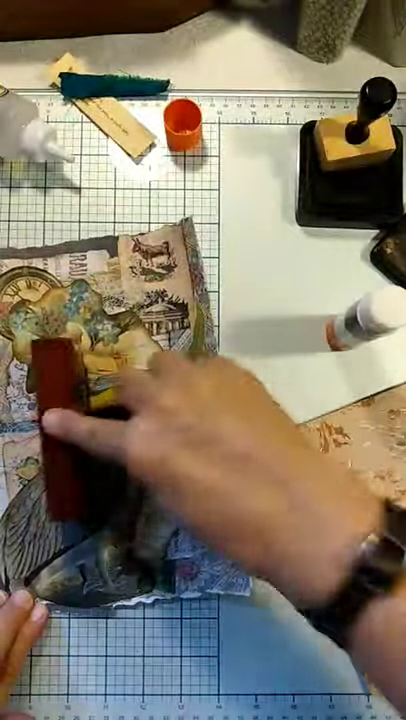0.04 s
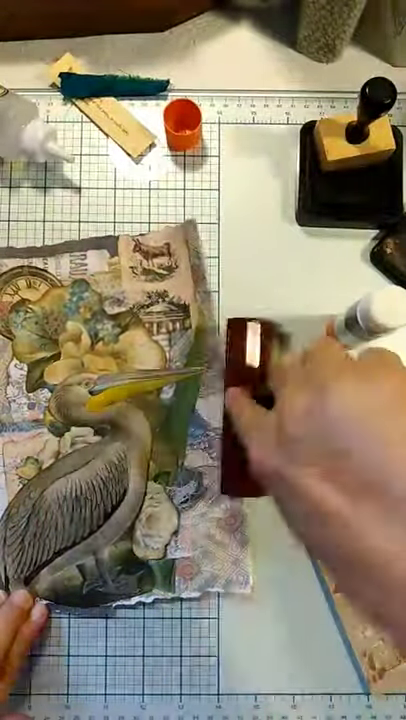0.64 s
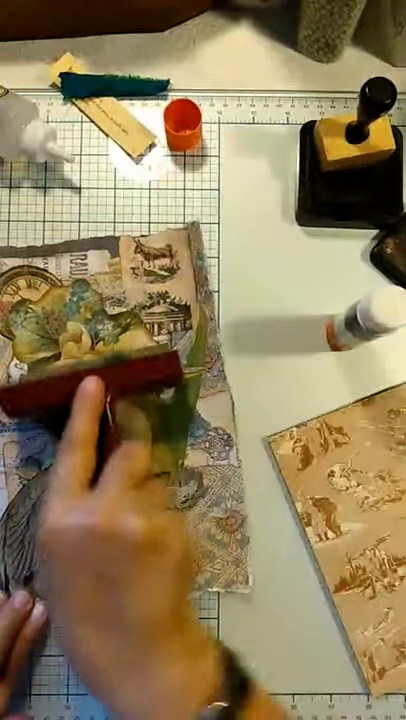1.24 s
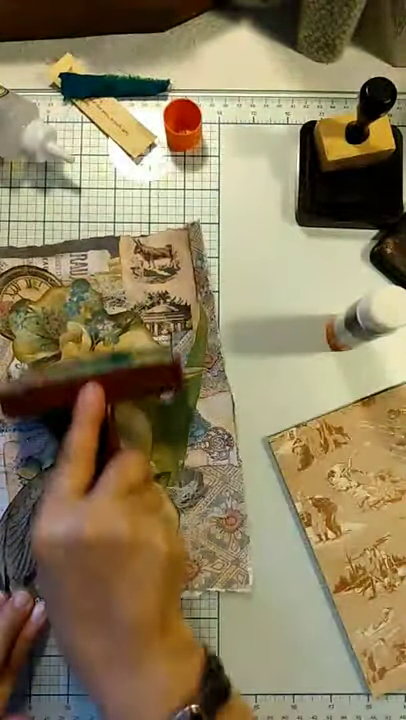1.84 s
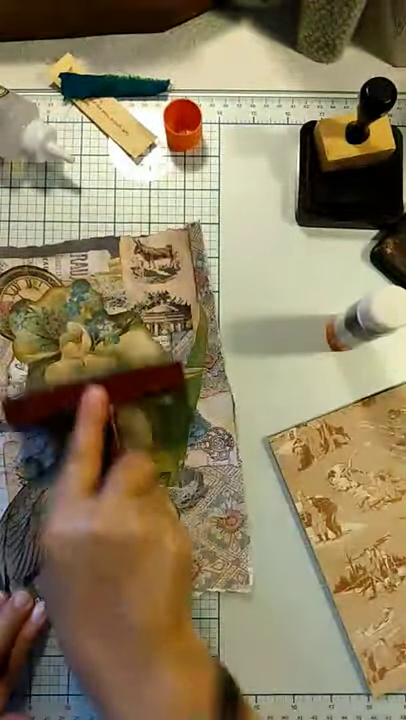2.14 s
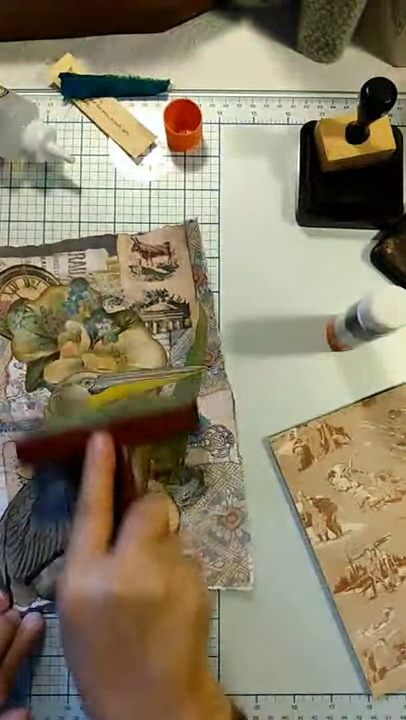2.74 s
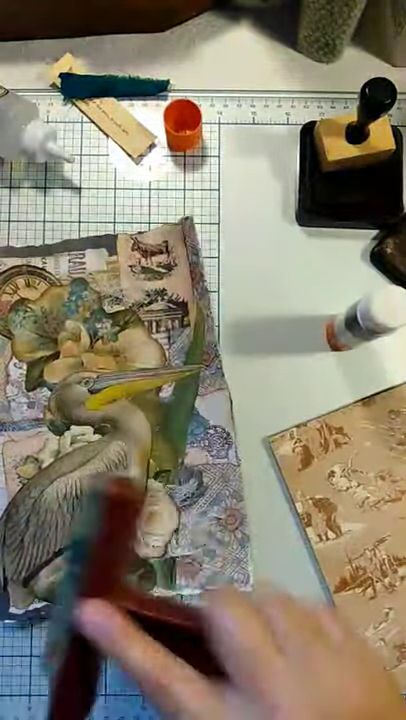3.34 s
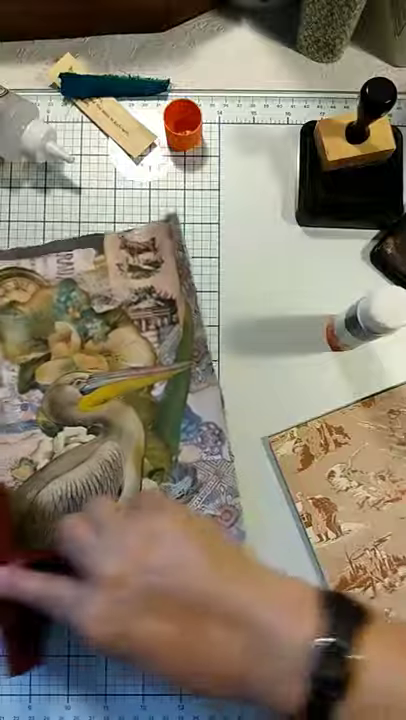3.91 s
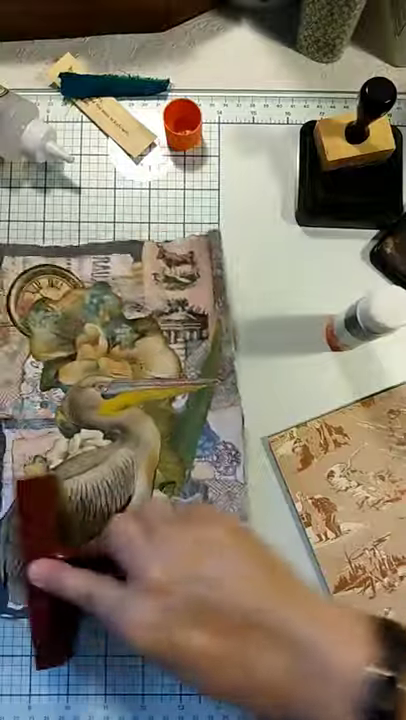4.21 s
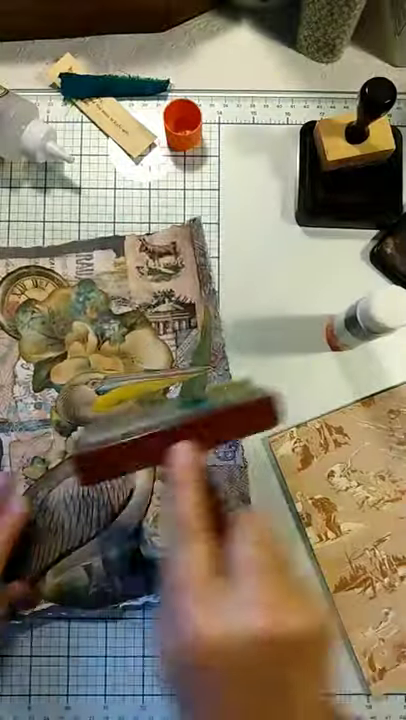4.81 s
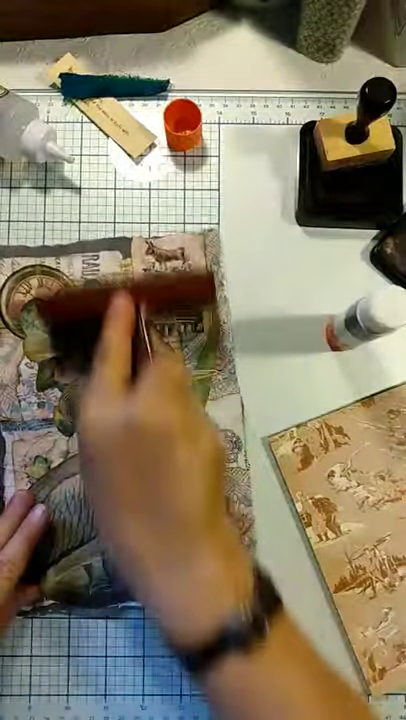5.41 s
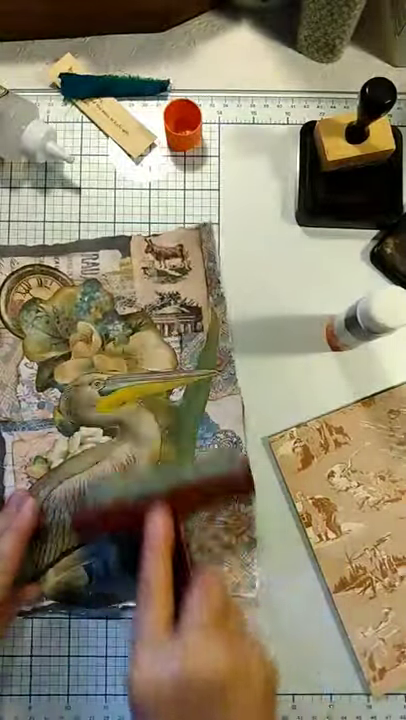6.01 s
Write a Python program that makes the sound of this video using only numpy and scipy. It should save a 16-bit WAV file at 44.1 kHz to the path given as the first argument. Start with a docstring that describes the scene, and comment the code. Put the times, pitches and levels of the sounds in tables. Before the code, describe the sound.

A rubber hand roller is pushed back and forth over glued paper on a craft table. Each stroke gives a fine, sticky crackle with small dry snaps, while the loose roller clicks in its metal frame and the axle chirps faintly. The tool thumps on the table midway, then clacks hard several times before more rolling with a low rumble. The microphone is close, in a small quiet room.

```python
"""Rubber brayer on a paper collage

A brayer rolls over glued paper on a craft table, close to a phone in a small room. Its tacky rubber
peels off the paper in a fine crackle, and the loose roller chirps and knocks in its frame. It lands
on the table with a thump, and the frame clacks hard when the tool is turned over and set down."""
import sys
import numpy as np
from scipy import signal
from scipy.fft import rfft, irfft
from scipy.io import wavfile

SR = 44100
rng = np.random.default_rng(int(sys.argv[2]) if len(sys.argv) > 2 else 0)


def master(y):
    """Save y as 16-bit WAV."""
    cut = np.clip(np.atleast_2d(y).T, -1, 1)
    pcm = np.round(cut * 32767)  # scale
    wavfile.write(sys.argv[1], SR, pcm.astype(np.int16))


N = 267000
T = np.arange(N) / SR

# Levels in the event tables are relative: each source adds its own gain. Pan is left minus right.
# Pushes and pulls. Each row: time of peak speed, rise and fall in seconds, then crackle level,
# rubbing level, rumble level and pan in dB.
ROLLER_STROKES = [(0.018, 0.085, 0.053, -54, -90, -82, -2), (0.112, 0.054, .065, -48.5, -76, -78, -2),
                  (0.295, 0.1, 0.089, -49, -67.5, -78, -1.5), (0.39, 0.087, 0.19, -62.5, -84.5, -81, 0),
                  (0.74, 0.21, 0.1, -61.5, -95, -86.5, 0), (1.72, 0.31, 0.34, -65.5, -85.5, -90, -0.5),
                  (2.02, 0.35, 0.5, -66, -92, -87, 3), (2.305, 0.11, 0.098, -51.5, -75.5, -80, 1),
                  (2.833, 0.054, 0.034, -51, -85, -70, 3.5), (2.929, 0.11, 0.056, -52, -84, -77, 6),
                  (2.978, .025, 0.095, -37, -73, -71.5, 5.5), (3.081, 0.077, 0.15, -48.5, -75.5, -85, 0.5),
                  (3.827, 0.065, 0.19, -48.5, -63.5, -76, 0), (4.08, 0.093, 0.1, -63, -78, -84.5, -3),
                  (4.2, 0.091, 0.074, -63.5, -88, -90, -3), (4.345, 0.11, 0.042, -56.5, -83, -84.5, -4),
                  (4.41, 0.042, 0.13, -47, -80.5, -81, -2.5), (4.56, 0.053, .04, -52.5, -73, -82.5, -5),
                  (5.42, 0.14, 0.26, -53.5, -76.5, -58.5, -3), (5.78, 0.033, 0.18, -50.5, -94, -66.5, -1.5),
                  (5.915, 0.058, 0.094, -54.5, -70, -73, 2), (5.995, 0.094, 0.086, -44.5, -69, -71, 3.5)]
# The roller hits its frame. Each row: time in seconds, ring level in dB, main frame resonance in Hz,
# tick level in dB, handle level in dB.
ROLLER_KNOCKS = [(0.7567, -40.5, 3120, -46, -71), (0.9825, -25.5, 3114, -36.5, -55),
                 (1.026, -26.5, 3310, -33, -51), (1.3447, -44, 3150, -54, -59),
                 (1.355, -34, 3170, -41.5, -44.5), (2.3067, -28, 3115, -42, -49),
                 (2.3831, -25.5, 3170, -32.5, -48), (2.5103, -26, 3060, -34, -52.5),
                 (2.7375, -20, 3220, -26.5, -36.5), (3.239, -46, 3280, -49, -67),
                 (3.3859, -44, 2950, -58, -64.5), (3.4485, -30, 3420, -44.5, -61.5),
                 (3.7024, -25, 3090, -26, -40), (3.933, -59.5, 2880, -53, -71.5),
                 (4.5802, -31, 3105, -40.5, -52.5), (4.7108, -45.5, 2850, -58, -77),
                 (4.794, -19.5, 3130, -32, -39), (4.8415, -43, 2900, -66, -58)]
# The frame hits the table. Each row: time in seconds, body and treble levels in dB, decay in seconds.
FRAME_CLACKS = [(4.8834, -25.5, -17.5, 0.0073), (4.914, -22.5, -59, 0.015), (5.0035, -24.5, -22, 0.0071),
                (5.151, -37.5, -47, 0.0061), (5.1875, -27, -26.5, 0.0017)]
# The largest sticky spots let go. Each row: time in seconds, then crackle level, pop level, pan in dB.
LARGE_SNAPS = [(0.0722, -38, -85, -8), (0.0874, -30, -87, -1), (0.1078, -34, -82, -12),
               (0.1401, -37.5, -88, -3), (0.382, -43, -90, 4), (0.463, -44, -74, 1),
               (0.597, -45, -58.5, -0.5), (1.3196, -44, -51.5, 0), (1.5891, -44, -78.5, 12),
               (1.6504, -39, -90, -2), (1.718, -30, -44.5, -5), (1.8262, -32.5, -64, 6.5),
               (1.916, -34.5, -96.5, -5.5), (1.9615, -38, -49, -6), (1.9794, -33, -48, -5.5),
               (2.0901, -39, -68, 0), (2.1227, -36.5, -72, -3.5), (2.1581, -31.5, -44, -2.5),
               (2.2034, -32.5, -50.5, -5), (2.5731, -39, -74.5, -10.5), (2.6584, -32.5, -41.5, -9),
               (2.973, -18.5, -48, 4.5), (3.022, -33, -49.5, -0.5), (3.3405, -41, -87, 0),
               (3.8216, -28, -57, -10), (4.4006, -33.5, -74, 0), (5.6147, -36, -79, -0.5),
               (5.756, -33.5, -75, -11), (5.7706, -27, -71, 12.5)]
# The table takes the load. Each row: time in seconds, boom and board levels in dB, boom decay in seconds.
TABLE_THUMPS = [(0.8, -76.5, -70, 0.016), (1.904, -85, -70.5, 0.007), (2.744, -37, -38.5, 0.044),
                (3.714, -46.5, -40, 0.023), (5.287, -54, -75, 0.021), (5.363, -42.5, -103, 0.012),
                (5.389, -40, -87, 0.0056), (5.465, -45.5, -78, 0.015)]
# Chirps of the dry axle. Each row: start in seconds, level in dB.
AXLE_CHIRPS = [(0.956, -42), (1.727, -39), (1.8455, -39), (1.979, -38), (2.038, -39), (2.09, -39.5),
               (2.195, -38.5), (2.3247, -26), (3.412, -50), (3.6665, -43), (4.7867, -25.5), (5.338, -44)]

# Modes of the frame and hollow handle. Each row: ratio to the main mode, bandwidth in Hz, gain in dB.
FRAME_MODES = [(0.719, 200, -10), (0.829, 221, -9.5), (.93, 170, 1), (1, 160, 2), (1.24, 263, -2.5),
               (1.599, 396, -22.5)]
HANDLE_MODES = [(.68, 89.3, -3), (1, 100, -2), (1.381, 130, -2.5), (1.9, 120, -2)]
# Modes of the rubbed frame and table top. Each row: frequency and filter bandwidth in Hz, gain in dB.
RUBBED_MODES = [(1072, 86, -17.5), (2520, 90, -13), (3142, 110, 2.5), (3617, 87, -12), (4310, 150, -7.5)]
TABLE_MODES = [(116.9, 5.9, 4), (172.6, 7.2, -5), (402, 8.4, -7.5)]
# Long ring of the metal. Each row: frequency in Hz, relative level in dB, 60 dB decay time in seconds.
METAL_PARTIALS = [(1160, -6, 0.33), (1540, -16.5, .35), (1720, -9, .45), (2200, -13.5, 0.3),
                  (2880, -6, 0.36), (2918, -9.5, 0.41), (3250, 12, 0.2), (3210, 5.5, 0.26)]
# Mains hum. Each row: frequency in Hz, level in dB.
HUM_PARTIALS = [(60, -89), (120, -82.5), (181, -84.5), (241, -91.5)]

# Spectra of the noisy sounds. Each row: frequency in Hz, relative spectral density in dB.
AIR_SPECTRUM = [(25, -19.5), (55, -5.5), (100, -9), (190, -9.5), (290, -11.5), (420, -9), (750, -17.5),
                (1400, -18.5), (3000, -23), (6000, -29), (10000, -22), (16000, -42.5)]
BOOM_SPECTRUM = [(35, -25.5), (55, -2), (85, 4.5), (120, 3.5), (190, -4.5), (300, -28.5), (700, -58)]
BOARD_SPECTRUM = [(130, -10), (210, -2), (290, -7), (400, -3.5), (540, -8), (720, -16), (1600, -38)]
CLACK_BODY_SPECTRUM = [(150, -61.5), (290, -44.5), (410, -8.5), (600, -8.5), (740, -6.5), (1150, 0.5),
                       (2400, 1), (4200, 2.5), (5600, -8), (8000, -31.5)]
CLACK_TREBLE_SPECTRUM = [(300, -70.5), (3500, -36), (5500, -6), (6500, -1), (7600, -4), (8650, 6),
                         (9400, -0.5), (10600, 1), (12000, -13), (15800, -23.5)]
TICK_SPECTRUM = [(500, -75.5), (2500, -26.5), (4500, -10.5), (6300, -9.5), (8000, -10), (9600, -0.5),
                 (11000, -8), (13000, -14), (15800, -25.5)]
POP_SPECTRUM = [(1500, -48.5), (2600, -23.5), (4000, 0), (5500, 5.5), (8000, 0), (15500, -14.5)]
CRACKLE_SPECTRUM = [(2000, -51.5), (4200, -33.5), (5500, -17.5), (7300, -7), (9600, 1.5), (12000, -2.5),
                    (15500, -9.5)]
# The parts of a knock that reach the frame and the handle. Each row: frequency in Hz, relative gain in dB.
FRAME_DRIVE = [(1000, -36.5), (2400, 4), (4500, -1.5), (8000, -18.5)]
HANDLE_DRIVE = [(410, -26), (1130, -0.5), (2400, 0), (3600, -22.5)]

# Rolling sounds. Each pair: index among a stroke's levels, exponent of the roller's speed.
CRACKLE_LAW, RUBBING_LAW, RUMBLE_LAW = (0, 1.91), (1, 1.87), (2, 1.57)


def undb(db):
    """Amplitude grows tenfold for every 20 dB."""
    return 10 ** (np.asarray(db) / 20)


def unit(x):
    """Normalisation sets the mean energy per channel to 1."""
    return x / np.sqrt(np.mean(np.sum(x ** 2, axis=-1)))


def panned(pan_db):
    """A level difference, split evenly between left and right gains, gives direction."""
    return undb(np.array([pan_db, -pan_db]).reshape(2, -1) / 2)


def add(out, start_s, sound):
    """Superposition: a sound adds to the mix from its start time."""
    i = max(int(start_s * SR), 0)
    out[:, i:i + sound.shape[1]] += sound[:, :N - i]


def colour(x, spectrum, size=2048):
    """A minimum-phase filter of unit energy, built by folding the cepstrum, imposes a spectrum."""
    hz, db = np.transpose(spectrum)
    bins_hz = np.maximum(np.fft.rfftfreq(size, 1 / SR), 1)
    magnitude = undb(np.interp(np.log(bins_hz), np.log(hz), db))
    cepstrum = irfft(np.log(magnitude))
    cepstrum[1:size // 2] *= 2
    cepstrum[size // 2 + 1:] = 0
    impulse = unit(irfft(np.exp(rfft(cepstrum))))
    return signal.oaconvolve(x, impulse[None], axes=1)[:, :x.shape[1]]


def resonate(x, modes):
    """Modal response: parallel resonators sum with alternating sign."""
    return sum((-1) ** k * undb(db) * signal.lfilter(*signal.iirpeak(hz, hz / width, fs=SR), x)
               for k, (hz, width, db) in enumerate(modes))


def contact(decay_s, correlation=0., size=4096):
    """Contact chatter is exponentially decaying noise, of which the two channels may share a part."""
    noise = rng.standard_normal((3, size))
    chatter = np.sqrt(1 - correlation) * noise[:2] + np.sqrt(correlation) * noise[2]
    return chatter * np.exp(-T[:size] / decay_s)


def wander(per_s, size=N):
    """Interpolation between random values gives a fluctuation with a spread near 1."""
    knots = rng.standard_normal(int(size * per_s / SR) + 2) * np.sqrt(3 / 2)
    return np.interp(T[:size] * per_s, np.arange(len(knots)), knots)


def speed(peak_s, rise_s, fall_s):
    """Uniform acceleration, then uniform braking, takes a stroke's speed from 0 to 1 and back."""
    return np.interp(T, [peak_s - rise_s, peak_s, peak_s + fall_s], [0, 1, 0])


def rolling_gain(index, exponent):
    """A power law links the roller's speed to the left and right amplitudes of a rolling sound."""
    return sum(undb(levels[index]) * speed(peak_s, rise_s, fall_s) ** exponent * panned(pan_db)
               for peak_s, rise_s, fall_s, *levels, pan_db in ROLLER_STROKES)


def background(air_db=-79, swell_db=0.26):
    """Room noise, coherent between the channels in the bass, lies under the partials of mains hum."""
    noise = rng.standard_normal((3, N))
    bass = signal.butter(1, 600, fs=SR)
    air = signal.lfilter(*bass, noise[2]) + noise[:2] - signal.lfilter(*bass, noise[:2])
    hum = sum(np.sqrt(2) * undb(db + 0.86 * wander(4.6)) * np.sin(2 * np.pi * (hz * T + rng.random()))
              for hz, db in HUM_PARTIALS)
    return colour(air, AIR_SPECTRUM) * undb(air_db + swell_db * wander(12)) + hum


def room(x, near_db=-5.0, near_s=0.017, far_db=-18, t60_s=0.37, treble_t60_s=0.29, size=22000):
    """Early reflections from the table precede a reverberant tail that decays faster in the treble."""
    t = T[:size]
    near, tail = rng.standard_normal((2, 2, size))
    near = near * np.exp(-t / near_s) * (t > .002)
    low = signal.lfilter(*signal.butter(1, 4000, fs=SR), tail)
    far = low * 1000 ** (-t / t60_s) + (tail - low) * 1000 ** (-t / treble_t60_s)
    echoes = undb(near_db) * unit(near) + undb(far_db) * unit(far * (1 - np.exp(-t / 0.02)))
    return x + signal.fftconvolve(x, echoes, axes=1)[:, :N]


def table_rumble(gain_db=-2, stereo_width=0.69):
    """Forced vibration: bumps in the paper layers shake the table under the moving roller."""
    bumps = rng.standard_normal(N) + stereo_width * rng.standard_normal((2, N))
    return colour(bumps * rolling_gain(*RUMBLE_LAW), BOOM_SPECTRUM) * undb(gain_db)


def frame_rubbing(gain_db=-2, patchy_db=2.5, pitch_drift=.016):
    """Friction from the roller excites the frame's modes, which sing unevenly and drift in pitch."""
    song = np.zeros((2, N))
    for hz, width, db in RUBBED_MODES:
        mode = [(hz, width, 0)]
        song += undb(db) * resonate(resonate(rng.standard_normal((2, N)), mode), mode)
    warped_time = np.cumsum(1 + pitch_drift * wander(13)) / SR
    song = np.array([np.interp(warped_time, T, side, period=T[-1]) for side in song])
    return song / song.std() * rolling_gain(*RUBBING_LAW) * undb(gain_db + patchy_db * wander(45))


def axle_whine(peak_s=2.892, pitch_hz=2110, sag_hz_per_s=900, wander_hz=70, gain_db=-69.5, rough_db=5):
    """Stick-slip in the bearing sustains one faint, broken tone that sinks in pitch."""
    hz = pitch_hz - sag_hz_per_s * (T - peak_s) + wander_hz * wander(240)
    gain = speed(peak_s, rise_s=0.079, fall_s=0.2) * undb(gain_db + rough_db * wander(110))
    return gain * np.sin(2 * np.pi * np.cumsum(hz) / SR)


def axle_chirps(pitch_hz=11200, scatter_hz=178, wander_hz=340, length_s=0.022, gain_db=-8, rough_db=5):
    """Stick-slip in the dry bearing gives short, rough chirps that catch at once and fade."""
    out, n = np.zeros((2, N)), int(length_s * SR)
    shape = np.sqrt(np.linspace(1, 0, n)) * (1 - np.exp(-T[:n] / 0.0014))
    for start_s, db in AXLE_CHIRPS:
        centre_hz = pitch_hz + scatter_hz * rng.uniform(-1, 1)
        hz = centre_hz + wander_hz * np.array([wander(980, n), wander(990, n)])
        gain = shape * undb(db + gain_db + rough_db * wander(300, n))
        add(out, start_s, gain * np.sin(2 * np.pi * np.cumsum(hz, axis=1) / SR))
    return out


def table_thumps(boom_db=23, board_db=26, board_s=0.025, ring_db=-9):
    """Sudden loading by the roller makes the table top boom and knock; its low modes ring on."""
    out = np.zeros((2, N))
    for at_s, boom_level, board_level, boom_s in TABLE_THUMPS:
        boom = unit(colour(contact(boom_s, correlation=0.76), BOOM_SPECTRUM))
        add(out, at_s - .003, undb(boom_level + boom_db) * boom * panned(pan_db=-9))
        knock = colour(contact(board_s, correlation=1, size=16000), BOARD_SPECTRUM)
        board = unit(knock) + undb(ring_db) * unit(resonate(knock, TABLE_MODES))
        add(out, at_s, undb(board_level + board_db) * board * panned(pan_db=-0.5))
    return out


def frame_clacks(body_db=22, treble_db=26, ring_db=-17, size=20000):
    """Hard impact on the table gives a broadband crack, then the free vibration of the metal."""
    out, t = np.zeros((2, N)), T[:size]
    ring = unit(sum(undb(db) * 1000 ** (-t / t60) * np.sin(2 * np.pi * (hz * t + rng.random((2, 1))))
                    for hz, db, t60 in METAL_PARTIALS))
    for at_s, body_level, treble_level, decay_s in FRAME_CLACKS:
        blow = contact(decay_s)
        body = undb(body_level + body_db) * unit(colour(blow, CLACK_BODY_SPECTRUM))
        treble = undb(treble_level + treble_db) * unit(colour(blow, CLACK_TREBLE_SPECTRUM))
        add(out, at_s + .0005, body + treble)
        add(out, at_s + 0.00033, undb(body_level + body_db + ring_db) * ring)
    return out


def axle_blow(slide_db=-18, slide_s=0.0039, hit_s=0.0032, bounce_db=-7, bounce_s=0.004):
    """Backlash lets the axle slide, hit and rebound; gives the blow and the seconds before its hit."""
    slide = undb(slide_db) * contact(slide_s, size=1024)[:, ::-1]
    hit = contact(hit_s)
    bounce = np.roll(contact(hit_s / 2), int(bounce_s * rng.uniform(.7, 1.3) * SR), axis=1)
    return np.hstack([slide, hit + undb(bounce_db) * bounce]), slide.shape[1] / SR


def roller_knocks(ring_db=18.5, tick_db=26, handle_db=23, handle_hz=1161):
    """Each impact of the loose roller ticks and excites the modes of the frame and the duller handle."""
    out = np.zeros((2, N))
    handle_modes = [(handle_hz * ratio, width, db) for ratio, width, db in HANDLE_MODES]
    for at_s, ring_level, frame_hz, tick_level, handle_level in ROLLER_KNOCKS:
        blow, lead_s = axle_blow()
        # the grip and the place of the hit shift the frame's resonances
        frame_modes = [(frame_hz * ratio, width, db) for ratio, width, db in FRAME_MODES]
        ring = undb(ring_level + ring_db) * unit(resonate(colour(blow, FRAME_DRIVE), frame_modes))
        tick = undb(tick_level + tick_db) * unit(colour(blow, TICK_SPECTRUM))
        handle = undb(handle_level + handle_db) * unit(resonate(colour(blow, HANDLE_DRIVE), handle_modes))
        add(out, at_s + 0.00086 - lead_s, (ring + tick + handle) * panned(pan_db=-2.24))
    return out


def small_snaps(per_s=28, over_db=9, scatter_db=3, pop_db=-29, pan_db=4):
    """Lesser sticky spots let go as a Poisson process; their rows follow the level of the crackle."""
    crackle = rolling_gain(*CRACKLE_LAW).mean(axis=0)
    at = np.flatnonzero((rng.random(N) < per_s / SR) & (crackle > 0))
    size, side = rng.uniform(-1.4, 1, (len(at), 2)).T
    db = 20 * np.log10(crackle[at]) + over_db + scatter_db * size
    return list(zip(T[at], db, db + pop_db, pan_db * side))


def sticky_snaps(crackle_db=11, pop_db=20):
    """Adhesion fails all at once at a sticky spot, giving a dry click with a deeper pop."""
    out = np.zeros((2, N))
    for at_s, crackle_level, pop_level, pan_db in LARGE_SNAPS + small_snaps():
        release = contact(decay_s=.0008, size=1024)
        click = undb(crackle_level + crackle_db) * unit(colour(release, CRACKLE_SPECTRUM))
        pop = undb(pop_level + pop_db) * unit(colour(release, POP_SPECTRUM))
        add(out, at_s + 0.00058, (click + pop) * panned(pan_db))
    return out


def peeling(per_s=1700, hiss=.25, spread_db=4.5, flutter_db=4.5):
    """Shot noise: threads of glue break behind the roller, many faint, a few strong, over a thin hiss."""
    at = np.flatnonzero(rng.random(N) < per_s / SR)
    sizes_db = spread_db * np.minimum(rng.exponential(size=len(at)), 3.5)
    impulses = undb(sizes_db) * rng.choice([-1, 1], len(at))
    # each break lies somewhere along the roller, so it reaches the right channel early or late
    lag_samples = rng.integers(-14, 15, len(at))
    breaks = np.zeros((2, N))
    breaks[0, at] = breaks[1, np.clip(at + lag_samples, 0, N - 1)] = impulses
    crackle = breaks / breaks.std() + hiss * rng.standard_normal((2, N))
    gain = rolling_gain(*CRACKLE_LAW) * undb(flutter_db * wander(81))
    return colour(crackle * gain, CRACKLE_SPECTRUM)


def scene():
    """The sounds of brayer and table superpose and reverberate over the room's background."""
    brayer = peeling() + frame_rubbing() + sticky_snaps() + roller_knocks() + frame_clacks()
    table = table_thumps() + table_rumble()
    axle = axle_chirps() + axle_whine()
    return room(brayer + table + axle) + background()


def record(dry):
    """The phone's limited bandwidth acts as a steep low-pass filter."""
    cutoff_hz = 16200
    return signal.sosfilt(signal.ellip(8, .2, 70, cutoff_hz, fs=SR, output="sos"), dry)


dry = scene()
out = record(dry)
master(out)
```